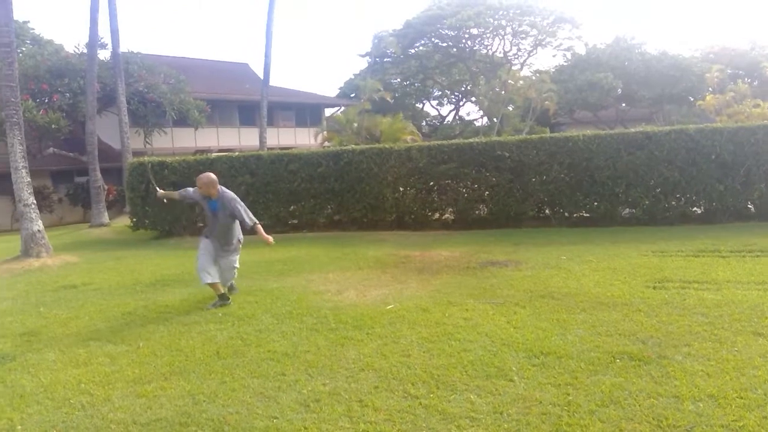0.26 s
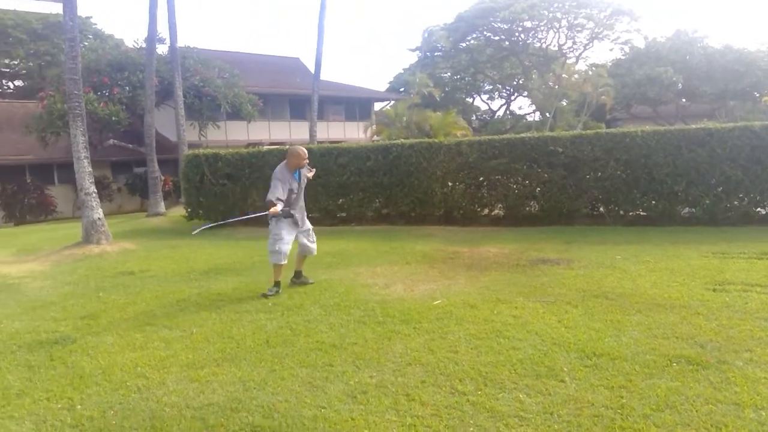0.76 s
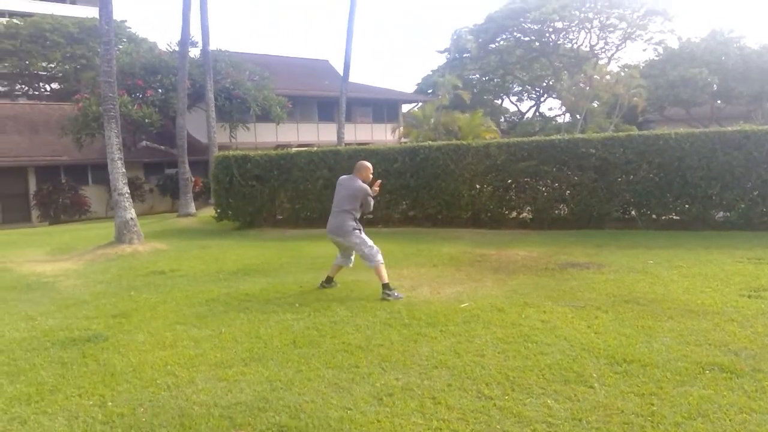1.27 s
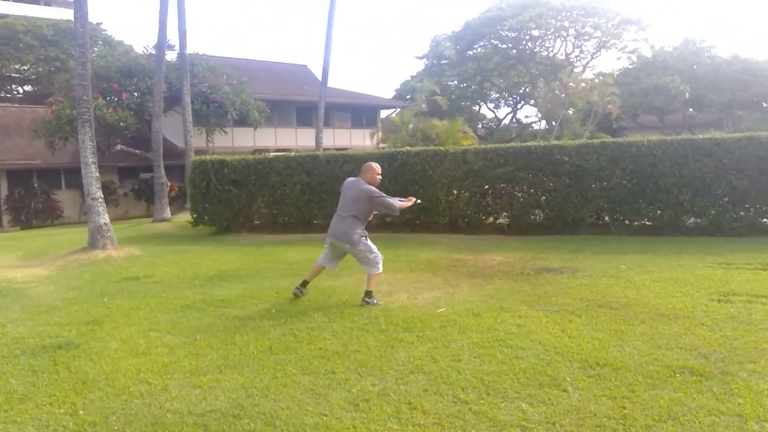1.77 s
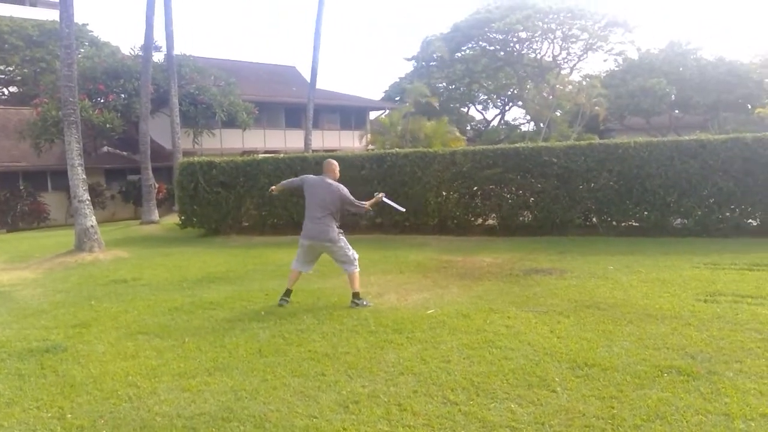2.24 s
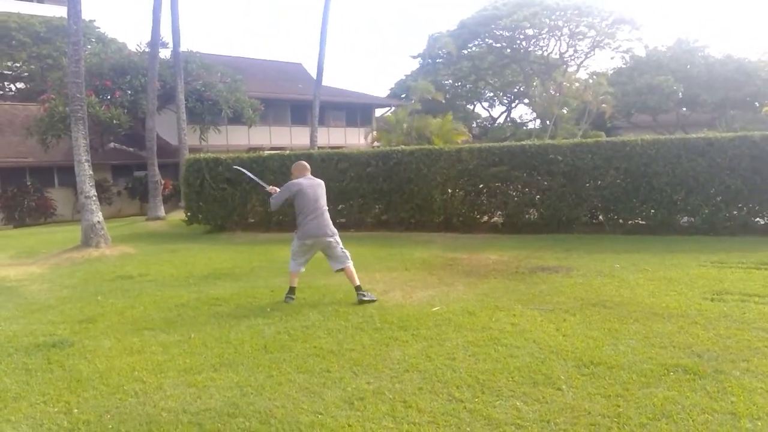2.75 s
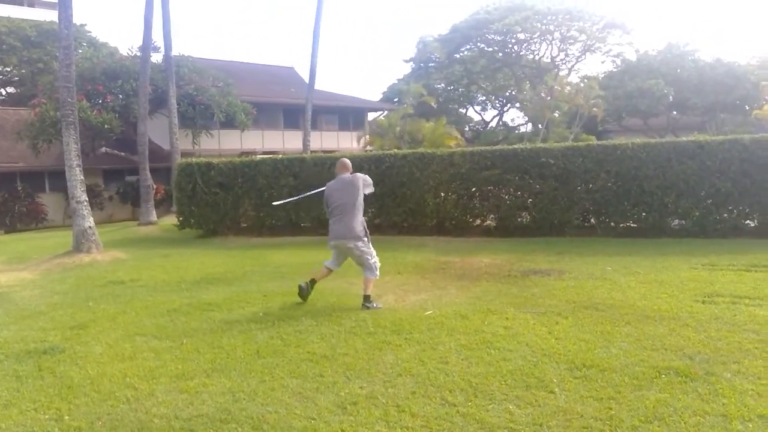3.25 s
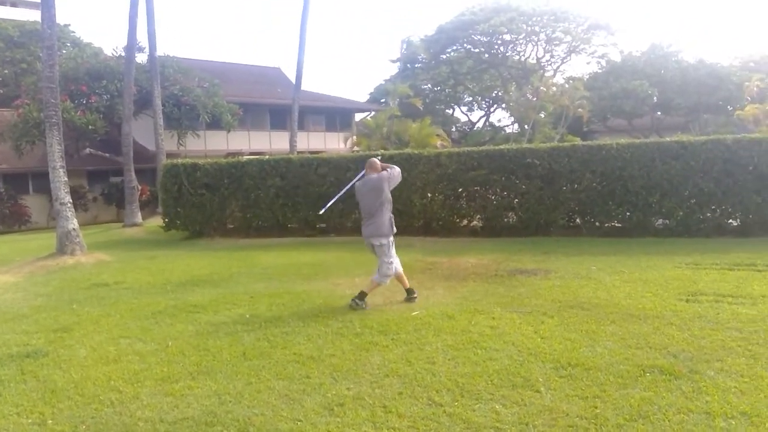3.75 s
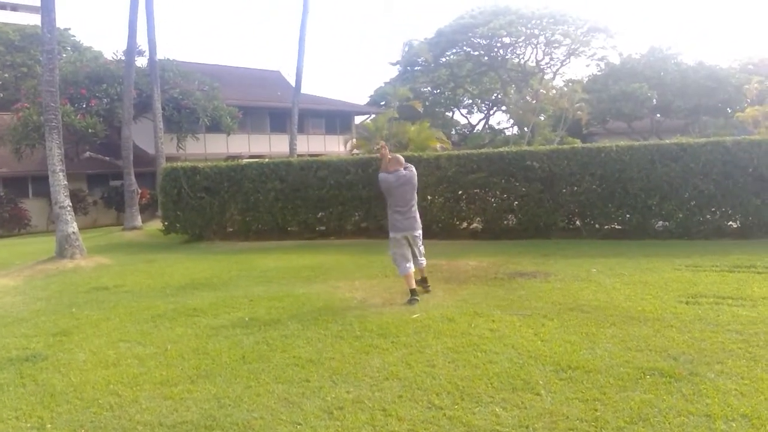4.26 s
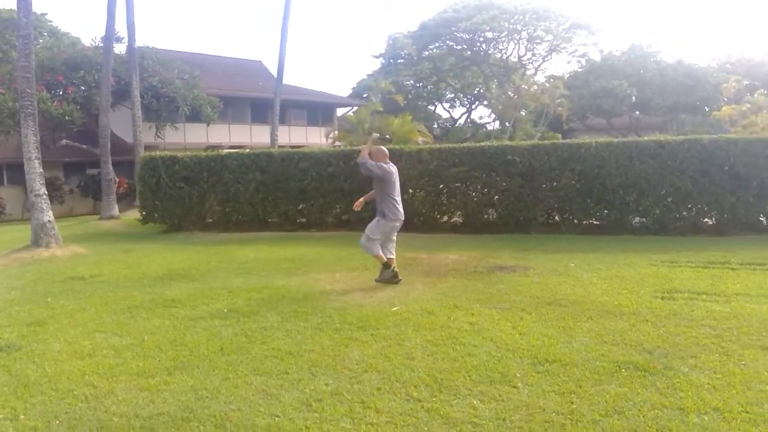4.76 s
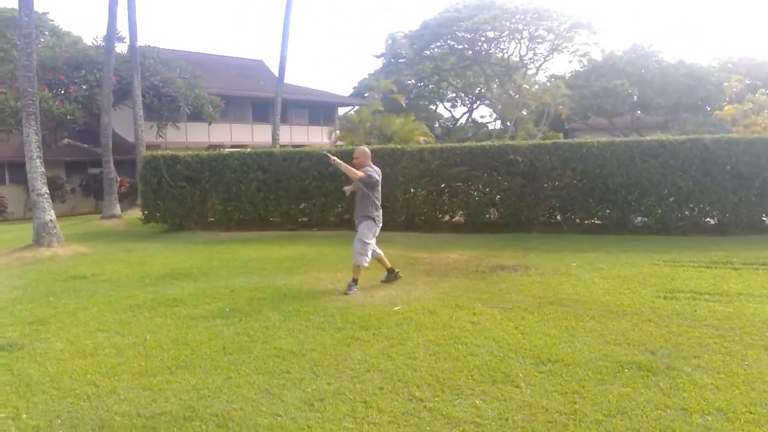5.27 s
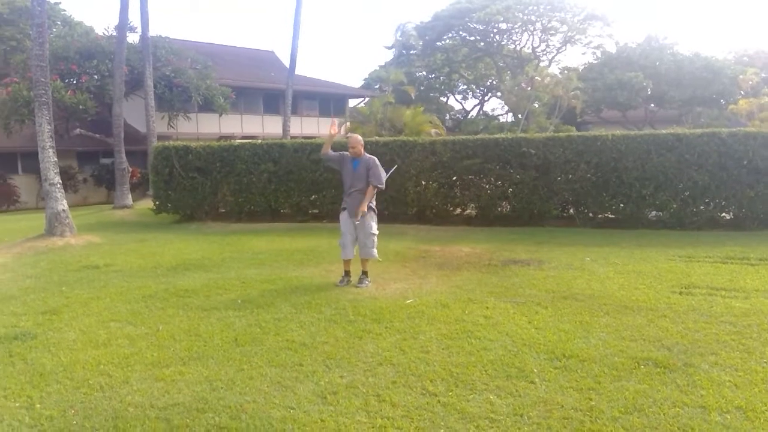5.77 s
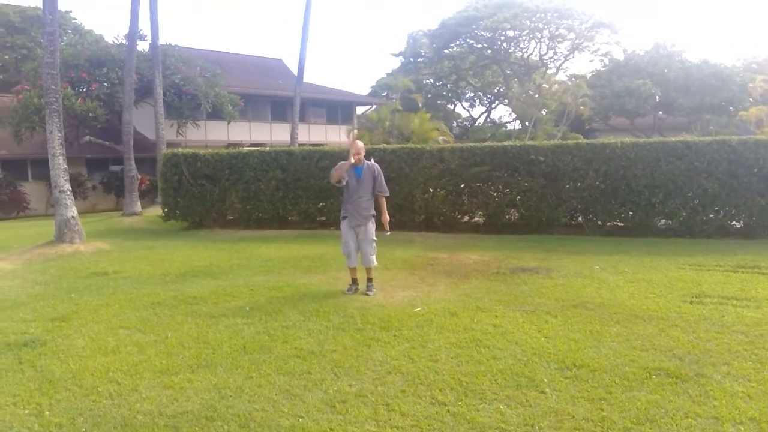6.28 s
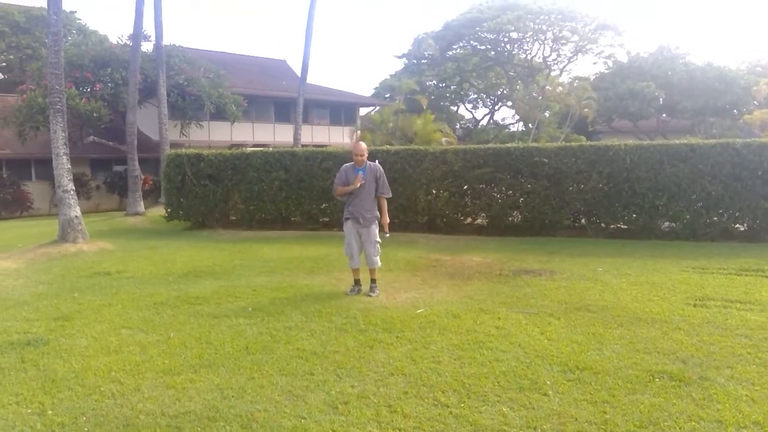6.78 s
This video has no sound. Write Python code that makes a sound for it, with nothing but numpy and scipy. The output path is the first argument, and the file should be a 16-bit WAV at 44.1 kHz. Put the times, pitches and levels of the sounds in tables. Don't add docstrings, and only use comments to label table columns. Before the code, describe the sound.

A quiet lawn with hedge and trees, in stereo, over a soft floor of far traffic and stirring leaves. From 0 to 0.8 s tiny metal fittings of a swung practice sword jingle high and dry on the right, with hissy cloth and leaf rustle; faint touches return near 1.7, 2.2 and 3.3 s. Soft right-hand coos come at 1.1-1.4 s. At 1.7 s a songbird on the right gives a single falling whistle, then two loud clusters at about 2.2-2.7 and 3.0-4.0 s: quick trills, sharp swoops and short downward slurs, scattered by the hedge. A near left dove throbs around 1 kHz at 2.6-3.3 s. Low wind thuds bump the microphone, strongest at 2.6, 3.5 and 4.2 s. From 4.3 s faint coos and thin tweets continue; the left dove resumes at 5.9-6.7 s, then near quiet by 7 s.

```python
import sys
import numpy as np
from scipy import signal
from scipy.io import wavfile
from scipy.ndimage import uniform_filter1d

SR = 44100
rng = np.random.default_rng(int(sys.argv[2]) if len(sys.argv) > 2 else 0)


def voltage_ratio(level):
    return 10 ** (np.asarray(level, float) / 20)


def inscribe(sig):
    pcm = np.round(np.clip(np.atleast_2d(sig).T, -1, 1) * 32767)
    wavfile.write(sys.argv[1], SR, pcm.astype(np.int16))


N = 309596


def rms_one(x):
    return x / np.sqrt(np.mean(x ** 2) + 1e-20)


def in_time(rows):
    s, *columns = np.transpose(rows)
    return [np.interp(np.arange(N) / SR, s, c) for c in columns]


def at_hz(points, hz):
    table = np.array(points)
    return np.interp(np.log(hz), np.log(table[:, 0]), table[:, 1])


def drift(rate):
    r = np.exp(-80 * np.pi * rate / SR)
    white = rng.standard_normal(N // 40 + 2002)
    slow = signal.lfilter([1], [1, -2 * r, r * r], white)[2000:]
    return np.interp(np.arange(N) / 40, np.arange(len(slow)), rms_one(slow))


PORT_LAG = 3


def place(x, pan_db, lag=PORT_LAG):
    left = np.roll(x * voltage_ratio(pan_db / 2), lag)
    right = x * voltage_ratio(-pan_db / 2)
    return np.array([left, right])


# f/Hz, left-right likeness/1
LIKENESS = [(100, 1), (400, 1), (1000, 0.49), (3000, 0.69), (10000, 0.66)]


def banded_noise(spectrum, patchy_db, alike=None):
    out, together = 0, drift(2.5)
    white = rng.standard_normal((2, 2, N))
    edges = 16 * 2 ** np.arange(0, 10.1, .5)
    for k, (low, high) in enumerate(zip(edges, edges[1:])):
        hz = np.sqrt(low * high)
        if not spectrum[0][0] / 1.2 < hz < spectrum[-1][0] * 1.2:
            continue
        band = signal.butter(2, [low, high], "band", fs=SR, output="sos")
        shared, own = signal.sosfilt(band, white[k % 2])
        share = at_hz(LIKENESS, hz) if alike is None else alike
        gain = voltage_ratio(at_hz(spectrum, hz) + patchy_db * (.4 * together + drift(12)))
        common = np.sqrt(1 + share) * place(shared, 0)
        opposed = np.sqrt(1 - share) * own * [[1], [-1]]
        out = out + gain * (common + opposed)
    return rms_one(out)


def garden(x, t60, wet_db, dull_hz, alike=0.3):
    t = np.arange(round(.9 * SR)) / SR
    thinning_db = 12.0 / (1 + np.exp((.19 - t) / 0.029))
    shape = voltage_ratio(-60 * t / t60 - thinning_db) * (1 - np.exp(-t / 0.0019))
    echoes = rng.standard_normal((2, len(t))) ** 3
    echoes[0] = alike * np.roll(echoes[1], PORT_LAG) + np.sqrt(1 - alike ** 2) * echoes[0]
    low_pass = signal.butter(3, dull_hz, fs=SR, output="sos")
    dull = signal.sosfilt(low_pass, echoes)
    tail = (dull + (echoes - dull) * voltage_ratio(0.5 - 40 * t / t60)) * shape
    tail = tail / np.sqrt(np.sum(tail ** 2, axis=1, keepdims=True))
    return voltage_ratio(wet_db) * signal.fftconvolve(x[None], tail, axes=1)[:, :N]


def pulse(length, start_hz, end_hz, db, waver):
    u = np.arange(round(length * SR)) / (length * SR)
    hz = start_hz * (end_hz / start_hz) ** u * waver[:len(u)]
    swell = np.sin(np.pi * u) ** 0.76
    return voltage_ratio(db) * swell * np.sin(2 * np.pi * np.cumsum(hz) / SR)


# f/Hz, spectral level/dB
FLOOR_COLOUR = [(59, -22.5), (100, 3.5), (124, -3.5), (234, -5), (283, -4), (315, -12), (547, -9),
                (1080, -3.5), (1390, -19.5), (1870, -12), (2470, -26), (6700, -36), (16000, -56)]


def far_floor():
    return voltage_ratio(-57.5) * banded_noise(FLOOR_COLOUR, patchy_db=3.5) * voltage_ratio([[-1.2], [1.2]])


# t/s, rumble level/dB, left-right/dB
WIND = [(0.0, -63, -0.5), (2.13, -64, 3.5), (2.31, -71.5, 0), (2.68, -55, 8.5), (3.5, -68, -11.5),
        (4.4, -62.5, 17), (4.89, -68.5, -1.5), (7.02, -63.5, -2.5)]
# f/Hz, spectral level/dB
WIND_COLOUR = [(12, -24), (20, 5), (45, 0.5), (150, -21.5), (169, -35.5), (199, -20.5), (350, -26.5),
               (460, -76), (770, -120)]


def wind():
    db, pan_db = in_time(WIND)
    lumps = banded_noise(WIND_COLOUR, patchy_db=2.0, alike=.35)
    return voltage_ratio(db + 13.0) * voltage_ratio(np.outer([.5, -.5], pan_db)) * lumps


# t/s, peak level/dB, f/Hz, left-right/dB
BUMPS = [(0.182, -35, 62, 8), (0.662, -35, 63, 14), (2.57, -40, 83.4, 20), (2.612, -23.5, 104, 39),
         (3.056, -37, 62, 17), (3.315, -40, 103, 21), (3.471, -27, 127, -25), (3.529, -27, 126, 34),
         (4.1265, -30, 131, 37), (4.165, -22.5, 149, 42), (4.322, -34, 56, 14), (4.362, -29, 104, 16),
         (4.48, -41.5, 80, 38)]
TICK_DB, LET_GO_S, TICK_ABOVE_HZ = -45, .0215, 120


def bumps():
    out = np.zeros((2, N))
    for s, db, hz, pan_db in BUMPS:
        t = np.arange(round(3.5 * SR / hz)) / SR
        envelope = (t * hz * 1.7) ** 2 * np.exp(2 - t * hz * 2.69)
        swing = envelope * np.sin(2 * np.pi * hz * t)
        weights = voltage_ratio(np.array([pan_db, -pan_db]) / 2)
        weights = weights / weights.mean()
        out[:, round((s + .006) * SR):][:, :len(t)] += voltage_ratio(db - 7.5) * np.outer(weights, swing)
        ticks = [round(s * SR), round((s + LET_GO_S) * SR)]
        out[:, ticks] += voltage_ratio(TICK_DB) * (hz > TICK_ABOVE_HZ) * weights[:, None]
    return out


# t/s, level/dB
RUSTLE = [(0.0, -77), (0.17, -87), (0.3, -78), (0.43, -76.5), (0.56, -71.5), (0.72, -73), (0.92, -70.5),
          (1.06, -81.5), (1.31, -79), (3.24, -78), (3.33, -87), (3.42, -76), (3.62, -84), (3.97, -80),
          (4.96, -86), (5.79, -84.5), (6.37, -91.5), (7.02, -88)]
# f/Hz, spectral level/dB
RUSTLE_COLOUR = [(1470, -37.5), (2500, 0.5), (6300, 8), (6920, 6.5), (7650, 0), (9580, -4), (14600, -7),
                 (16000, -12)]


def rustle():
    grains = voltage_ratio(1.2 * drift(85))
    hiss = banded_noise(RUSTLE_COLOUR, patchy_db=2.5, alike=.6)
    return voltage_ratio(in_time(RUSTLE)[0] + 10.5) * grains * hiss * voltage_ratio([[-5], [3.5]])


def ring(clicks, hz, t60):
    r, w = voltage_ratio(-60 / (t60 * SR)), 2 * np.pi * hz / SR
    return signal.lfilter([0, np.sin(w)], [1, -2 * r * np.cos(w), r * r], clicks + 1e-18)


# t/s, peak level/dB, strongest mode f/Hz
JINGLE = [(0.0223, -60.5, 13100), (0.0588, -64, 13500), (0.1937, -58, 12800), (0.1945, -59, 10360),
          (0.2693, -47, 10820), (0.2699, -48.5, 7440), (0.297, -47, 6400), (0.299, -54, 9200),
          (0.3561, -51.5, 6520), (0.3754, -54, 8740), (0.421, -52, 6650), (0.442, -48.5, 13300),
          (0.4544, -46, 13400), (0.4694, -48.5, 6370), (0.4854, -51, 11200), (0.498, -46.5, 13600),
          (0.511, -49.5, 6480), (0.5165, -46.5, 13700), (0.5214, -45, 5230), (0.5344, -49, 12400),
          (0.55, -56, 9100), (0.575, -53.5, 5360), (0.6067, -47.5, 6530), (0.6276, -46.5, 6550),
          (0.674, -50.5, 6620), (0.7594, -56, 7900), (1.3094, -74, 11900), (1.598, -72, 13400),
          (1.6067, -66, 13400), (1.63, -61, 13500), (1.6816, -59, 13100), (1.722, -64, 13100),
          (2.1126, -57, 9580), (2.2358, -55.5, 10900), (2.3032, -53, 10000), (2.3471, -55, 14100),
          (3.2783, -68, 8090), (3.2848, -67, 13200), (3.2967, -62, 10800), (3.3222, -67, 10700),
          (3.3336, -52.5, 7340), (3.345, -68, 13700), (3.362, -74, 12900), (3.4419, -55, 9100),
          (5.45, -79, 12000), (5.78, -70.5, 12700), (5.91, -74, 11750), (5.95, -70, 11200),
          (5.98, -73, 13900)]
# f/Hz, level/dB, t60/s
FITTINGS = [(4640, -23, 0.03), (5400, -18, 0.03), (6560, -14, 0.035), (7550, -17, 0.03), (9200, -15, 0.025),
            (10800, -19, 0.03), (12000, -18, 0.02), (13150, -18, 0.02), (13600, -19, 0.03),
            (14760, -15, 0.018)]
STRIKE_DB, RATTLE_DB, RATTLE_T60_S = 20, 3, 0.077
STRONGEST_DB, STRONGEST_T60_S = -4, 0.023
MODE_SHIFT = 0.0317


def fittings():
    out, t = np.zeros(N), np.arange(round(.15 * SR)) / SR
    chance = rng.standard_normal((len(JINGLE), 2, len(FITTINGS)))
    rattles = rng.standard_normal((len(JINGLE), len(t))) * voltage_ratio(-60 * t / RATTLE_T60_S)
    high = signal.butter(2, 4500, "high", fs=SR, output="sos")
    for (s, db, top_hz), (shifts, strengths), rattle in zip(JINGLE, chance, rattles):
        shaking = voltage_ratio(RATTLE_DB) * rattle + voltage_ratio(STRIKE_DB) * (t == 0)
        sound = voltage_ratio(STRONGEST_DB) * ring(shaking, top_hz, STRONGEST_T60_S)
        sound += voltage_ratio(12.0) * signal.sosfilt(high, shaking)
        for (hz, level_db, t60), shift, strength in zip(FITTINGS, shifts, strengths):
            mode = ring(shaking, hz * (1 + MODE_SHIFT * shift), t60)
            sound += voltage_ratio(level_db - 3 + 2.5 * strength) * mode
        out[round(s * SR):][:len(t)] += voltage_ratio(db - 22.5) * sound
    scatter = garden(out, t60=0.38, wet_db=1.5, dull_hz=14400, alike=0.24)
    return place(out, -21.0) + scatter * voltage_ratio([[-8], [0]])


# t/s, length/s,
# start f/Hz, end f/Hz, peak level/dB
TWEETS = [(1.059, 0.047, 3850, 3540, -58), (1.199, 0.029, 3920, 3880, -51), (1.425, 0.019, 2220, 2200, -60),
          (1.426, .015, 3450, 3350, -61), (1.442, .022, 4500, 4400, -59), (1.671, 0.017, 5000, 5200, -44.5),
          (1.978, 0.04, 4530, 4600, -54.5), (2.854, 0.09, 4580, 4010, -61),
          (3.223, 0.039, 2258, 2354, -40.5), (3.317, 0.026, 2266, 2280, -42), (3.776, 0.2, 4200, 3970, -59),
          (4.235, 0.095, 3470, 2900, -58.5), (4.305, 0.079, 4870, 3900, -59),
          (4.497, 0.021, 4940, 4870, -62), (4.51, .016, 3600, 3550, -63.5), (5.11, 0.071, 4710, 4420, -67),
          (5.435, 0.051, 4700, 3870, -70), (6.53, .04, 4150, 4200, -74), (6.691, 0.031, 4420, 3970, -66.5),
          (6.728, 0.054, 3940, 3880, -70), (6.85, 0.022, 4700, 4300, -67), (6.862, 0.078, 4300, 4330, -76),
          (6.938, .05, 2720, 2800, -70)]


def far_birds():
    out, waver = np.zeros(N), 1 + 0.019 * drift(100)
    chorus = []
    for a, b, c, d in rng.random((90, 4)):
        hz = 2500 * 3 ** c
        chorus.append((6.9 * a, .02 + .05 * b, hz, hz * (.8 + .25 * d), -83 + 5 * b))
    for s, length, start_hz, end_hz, db in TWEETS + chorus:
        at = round(s * SR)
        tweet = pulse(length, start_hz, end_hz, db, waver[at:])
        out[at:][:len(tweet)] += tweet
    out = out * voltage_ratio(-5 + 4.5 * drift(70))
    return place(out, -6) + garden(out, t60=.3, wet_db=-7, dull_hz=6000)


NEW_COO_S, RISE, SAG = .04, 0.087, 0.08


def coo_pulses(rows, glide):
    out, end = [], -1
    for s, length, hz, db, *_ in rows:
        opens = s - end > NEW_COO_S
        bend = glide * (RISE if opens else -SAG) / 2
        out.append((s, length, hz * (1 - bend), hz * (1 + bend), db, opens))
        end = s + length
    return out


# t/s, length/s, f/Hz, peak level/dB
NEAR_COOS = [(2.585, 0.033, 1050, -35.5), (2.625, .025, 1207, -62), (2.645, 0.053, 1170, -37.5),
             (2.697, 0.0204, 1033, -35.5), (2.72, .03, 1177, -52.5), (2.890, .022, 984, -36.5),
             (2.986, 0.019, 1038, -35), (3.008, .03, 1126, -44.5), (3.036, .022, 1141, -44),
             (3.06, 0.019, 1096, -40.5), (3.222, 0.032, 995, -40.5), (3.245, 0.061, 1149, -44.5),
             (3.302, .026, 1094, -44), (5.880, 0.035, 1056, -40), (5.908, .032, 1163, -47.5),
             (5.946, 0.03, 1131, -40), (5.996, 0.033, 1050, -44), (6.052, 0.019, 990, -47.5),
             (6.125, 0.021, 984, -47), (6.212, .03, 1067, -33), (6.252, 0.03, 1040, -55),
             (6.322, 0.044, 1107, -42), (6.364, 0.041, 1078, -39), (6.412, 0.0217, 1084, -47),
             (6.482, .024, 1100, -58.5), (6.579, .03, 1123, -42), (6.612, .02, 1124, -47),
             (6.636, 0.037, 1070, -40), (6.68, 0.082, 1071, -54.5)]
# t/s, length/s, f/Hz, peak level/dB
RIGHT_COOS = [(0.0, 0.046, 1071, -54.5), (1.068, 0.027, 1065, -52), (1.09, 0.12, 1249, -44),
              (1.198, .035, 1231, -43), (1.365, 0.09, 1208, -51), (2.284, 0.049, 1112, -54),
              (2.526, 0.12, 978, -50.5), (4.27, 0.13, 1262, -46.5), (4.365, 0.082, 1228, -56),
              (4.533, 0.071, 1229, -49), (4.583, 0.046, 1196, -50)]
# t/s, length/s, f/Hz, peak level/dB, left-right/dB
FAR_COOS = [(5.057, 0.083, 1215, -57.5, 19), (5.121, 0.083, 1184, -56, 20.5),
            (5.185, 0.092, 1154, -59.5, 3.5), (5.298, .04, 942, -48, -4), (5.334, 0.087, 1134, -57.5, -4),
            (5.514, 0.02, 1122, -48.5, -5), (5.625, 0.04, 1070, -60.5, 5), (5.74, 0.03, 1108, -56.5, -9)]
NEAR_PAN_DB, NEAR_LATER_DB, RIGHT_PAN_DB = 5.5, 11, -11
NEAR_GLIDE, OTHER_GLIDE = 0.75, 0.35


def coos():
    near = [(*p, NEAR_PAN_DB + NEAR_LATER_DB * (not opens))
            for *p, opens in coo_pulses(NEAR_COOS, NEAR_GLIDE)]
    right = [(*p, RIGHT_PAN_DB) for *p, _ in coo_pulses(RIGHT_COOS, OTHER_GLIDE)]
    far = [(*p, row[-1]) for (*p, _), row in zip(coo_pulses(FAR_COOS, OTHER_GLIDE), FAR_COOS)]
    return near + right + far


# f/Hz, spectral level/dB
BREATH_COLOUR = [(150, 3), (250, 3), (418, 1), (456, -3), (900, 8.5), (1170, -34.5), (1980, -120)]


def doves():
    out, effort = np.zeros((2, N)), np.zeros(N)
    waver, throb = 1 + 0.013 * drift(36.0), voltage_ratio(2.0 * drift(40))
    for s, length, early_hz, late_hz, db, pan_db in coos():
        at = round(max(s - .12 * length, 0) * SR)
        coo = pulse(1.14 * length, early_hz, late_hz, db, waver[at:])
        out[:, at:at + len(coo)] += np.outer(voltage_ratio([pan_db / 2, -pan_db / 2]), coo)
        leaks = (pan_db > -4.5) * (early_hz < 1165)
        effort[at:at + len(coo)] += abs(coo) * leaks
    linger = voltage_ratio(-60 / (.5 * SR))
    effort = uniform_filter1d(effort, size=300)
    lingering = 0.29 * effort + signal.lfilter([1 - linger], [1, -linger], effort)
    low_pass = signal.butter(6, 1000, fs=SR, output="sos")
    air = signal.sosfilt(low_pass, banded_noise(BREATH_COLOUR, patchy_db=-2.0, alike=1.0))
    air = voltage_ratio(-4.0) * abs(lingering) ** 0.71 * air
    out = throb * np.array([np.roll(out[0], PORT_LAG), out[1]])
    scatter = garden(out.mean(axis=0), t60=0.48, wet_db=-7.0, dull_hz=4050, alike=0.44)
    return out + voltage_ratio(-12.0) * air * voltage_ratio([[3], [-5]]) + scatter


FLIP_S, WIDE_FLIP_S, LAST_DIP_HZ, SWELL_DB = .0112, .0075, 2800, 2.5


def trill(length, low_hz, high_hz):
    flip = FLIP_S + WIDE_FLIP_S * (high_hz / low_hz - 1)
    points, flips = [], int(length / flip + .3)
    for k in range(flips):
        last = k == flips - 1
        s = k * flip
        db = -SWELL_DB * (flips - 1 - k) + 1.8 * rng.standard_normal()
        dip_hz = LAST_DIP_HZ if last else low_hz
        points += [(s, LAST_DIP_HZ, db - 3),
                   (s + .14 * flip, dip_hz, db + 3),
                   (s + .34 * flip, dip_hz * .98, db - 8),
                   (s + .48 * flip, high_hz * 1.01, db),
                   (s + .7 * flip, high_hz, db),
                   (s + .9 * flip, high_hz * .97, db - (5 if last else 9))]
    return points + [(length, .95 * high_hz, -8)]


def slur(length, start_hz, end_hz):
    return [(0, start_hz, -3),
            (.25 * length, start_hz, -1),
            (.6 * length, start_hz ** .15 * end_hz ** .85, -1),
            (.98 * length, end_hz, -5)]


# t/s, f/Hz, level/dB
ARCH = [(0, 3380, -52), (.019, 3420, -47), (.050, 3900, -37), (.091, 4040, -40), (.104, 3350, -38),
        (.112, 2800, -25), (.126, 2300, -33), (.160, 2050, -33), (.212, 1930, -44)]
SWOOP = [(0, 4000, -38), (.006, 5200, -33), (.012, 5500, -33), (.018, 3300, -33), (.024, 3900, -26),
         (.033, 5000, -31), (.042, 2750, -30), (.056, 2500, -38), (.085, 2290, -35)]
WIDE_SWOOP = [(0, 4700, -40), (.006, 5400, -33), (.012, 5480, -34), (.017, 3600, -32), (.026, 4850, -35),
              (.037, 5150, -37), (.042, 3300, -27), (.054, 2790, -31), (.075, 2640, -32)]
HUMPS = [(0, 2100, -6), (.003, 2740, 0), (.015, 2820, 0), (.019, 2250, -10), (.023, 2850, -3),
         (.030, 2850, -3), (.034, 2170, -10), (.048, 2000, -14)]
FALL = [(-.007, 4900, -30), (-.004, 4000, -29), (-.001, 2880, 1), (.003, 2480, 1), (.009, 2370, -4),
        (.024, 2340, -4), (.036, 2270, 1), (.047, 2250, -1), (.055, 2260, -6)]
DROOP = [(-.004, 2900, -46), (0, 2780, -30), (.006, 2420, -32), (.018, 2310, -39), (.030, 2290, -34),
         (.042, 2230, -30), (.054, 2160, -28), (.062, 2110, -37), (.072, 2060, -45)]
TWO_HOLDS = [(0, 2100, -44), (.005, 2700, -35), (.011, 2800, -28), (.019, 2830, -29), (.023, 2500, -40),
             (.025, 2900, -29), (.034, 2740, -29), (.040, 2280, -37), (.050, 2200, -45)]
# figure, t/s, pitch ratio/1, stretch/1, level/dB
FIGURES = [(ARCH, 1.673, 1, 1, 0), (SWOOP, 2.515, 1, 1, 0), (WIDE_SWOOP, 3.319, 1, 1, 0),
           (HUMPS, 2.611, 1, 1, -22), (TWO_HOLDS, 3.415, 1, 1, 0), (FALL, 2.316, 1.01, 1, -28),
           (DROOP, 3.096, 1, 1, 0), (FALL, 3.9445, .965, 1.12, -28)]
# t/s, length/s, low f/Hz, high f/Hz, last level/dB
TRILLS = [
    (2.2435, .0535, 2170, 3070, -27),
    (3.030, .047, 2650, 3220, -34),
    (3.860, .070, 2680, 3360, -30),
]
# t/s, length/s, start f/Hz, end f/Hz, level/dB
SLURS = [(2.165, .014, 2150, 2200, -44), (2.182, .013, 1850, 2200, -38), (2.669, .007, 2950, 2600, -27),
         (2.677, .005, 2600, 2850, -31), (2.682, .006, 2500, 2000, -31), (2.692, .011, 2600, 1950, -33),
         (2.706, .010, 2900, 1950, -34), (2.719, .010, 2900, 1980, -33), (2.733, .009, 2850, 2100, -36),
         (2.970, .025, 2050, 1980, -42), (3.010, .008, 4100, 4100, -51), (3.490, .016, 2850, 2100, -37),
         (3.511, .010, 2750, 2850, -40), (3.523, .009, 2200, 2050, -35), (3.536, .009, 2150, 1950, -37),
         (3.555, .020, 1800, 1700, -47), (3.398, .012, 2330, 2310, -36), (3.808, .025, 2150, 2230, -53),
         (3.931, .0055, 3200, 3190, -35), (4.328, .040, 2204, 2157, -48)]


def song():
    notes = []
    for figure, s, ratio, stretch, db in FIGURES:
        notes.append([(s + stretch * t, ratio * hz, db + d) for t, hz, d in figure])
    for shape, rows in [(trill, TRILLS), (slur, SLURS)]:
        for s, length, one_hz, other_hz, db in rows:
            notes.append([(s + t, hz, db + d) for t, hz, d in shape(length, one_hz, other_hz)])
    return notes


OVERTONES_DB = [-4.5, -18.5, -29]
# f/Hz, level/dB
BEAK = [(4500, -33), (5700, -16), (6600, -10), (7900, -32), (9400, 4.5), (10800, -11.5), (12300, 3),
        (15000, -15)]


def songbird():
    height, times, pitches = np.zeros(N), [], []
    for points in song():
        s, point_hz, db = np.transpose(points)
        during = np.arange(round(s[0] * SR), round(s[-1] * SR))
        height[during] = voltage_ratio(np.interp(during / SR, s, db))
        times += list(s)
        pitches += list(point_hz)
    order = np.argsort(times)
    log_hz = np.interp(np.arange(N) / SR, np.array(times)[order], np.log(pitches)[order])
    hz = uniform_filter1d(np.exp(log_hz), size=80)
    phase = 2 * np.pi * np.cumsum(hz) / SR
    throw = np.gradient(np.log2(hz)) * SR / 1000
    height = height * voltage_ratio(3 - 60 * np.maximum(throw, 0) + 15 * np.minimum(throw, 0))
    height = uniform_filter1d(uniform_filter1d(height, size=50), size=50)
    height = height * voltage_ratio(1.5 * drift(70) + 1.2 * abs(throw + .02) ** .2 * np.roll(drift(70), 999))
    overtones = 0
    for partial, db in enumerate(OVERTONES_DB, 2):
        hoarse = 0.34 + drift(230)
        overtones = overtones + voltage_ratio(db + at_hz(BEAK, hz * partial)) * hoarse * np.sin(partial * phase)
    moving_db = 150 * uniform_filter1d(abs(throw), size=90)
    overtones = height * overtones * voltage_ratio(-moving_db - 9 / (1 + (4400 / hz) ** 12))
    hanging = garden(overtones, t60=0.18, wet_db=-5.0, dull_hz=14200) * voltage_ratio([[-7], [0]])
    voice = height * np.sin(phase)
    ringing = garden(voice, t60=2.0, wet_db=-12, dull_hz=2800, alike=.4) * voltage_ratio([[-2.0], [0]])
    direct = place(voltage_ratio(-5.0) * (voice + overtones), -9.0 - 3.7 * np.log2(hz / 2500))
    return hanging + direct + ringing


def scene():
    floor = far_floor()
    birds = songbird() + doves() + far_birds()
    handling = fittings() + rustle()
    air = wind() + bumps()
    return birds + handling + air + floor


def band_limit(x):
    return signal.sosfilt(signal.butter(12, 16500, fs=SR, output="sos"), x)


def record(dry):
    cut = signal.cheby2(12, 60, 16300, fs=SR, output="sos")
    mix = signal.sosfilt(cut, dry)
    return band_limit(mix)


dry = scene()
out = record(dry)
inscribe(out)
```